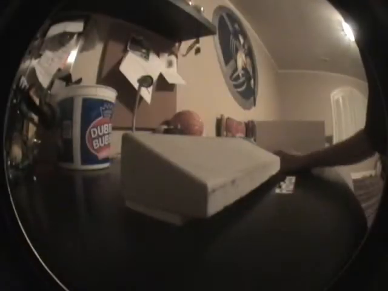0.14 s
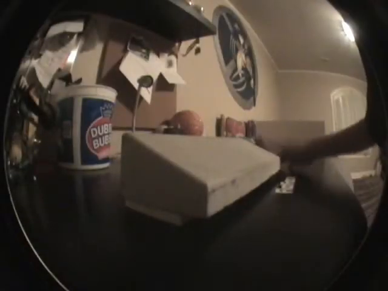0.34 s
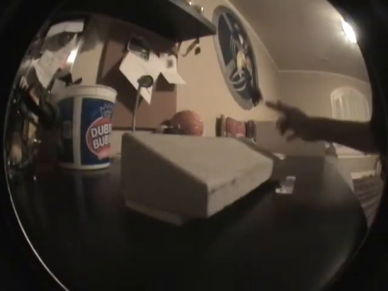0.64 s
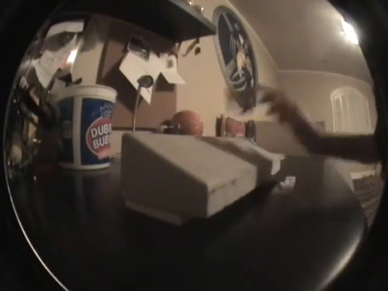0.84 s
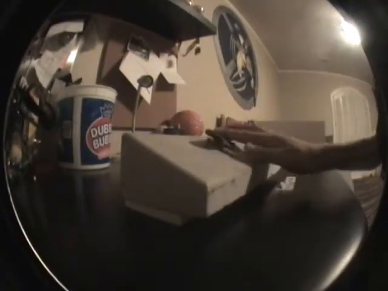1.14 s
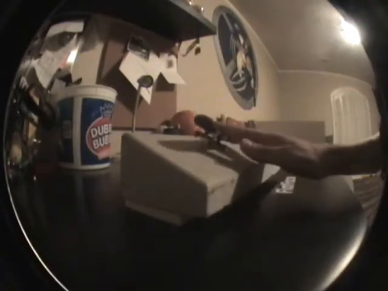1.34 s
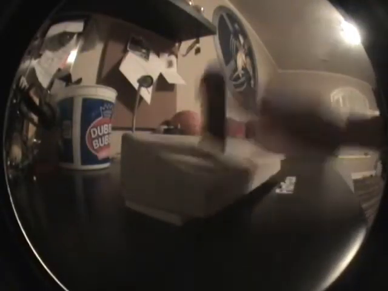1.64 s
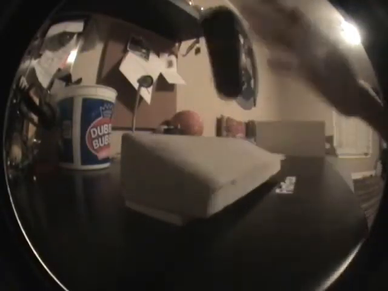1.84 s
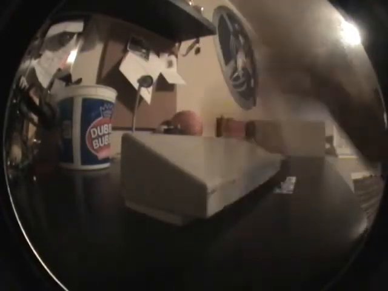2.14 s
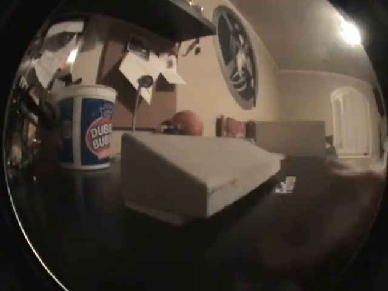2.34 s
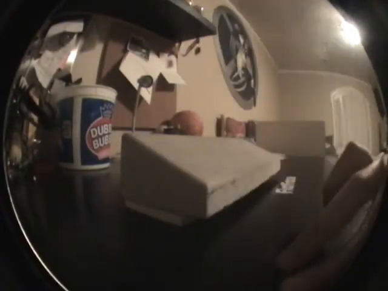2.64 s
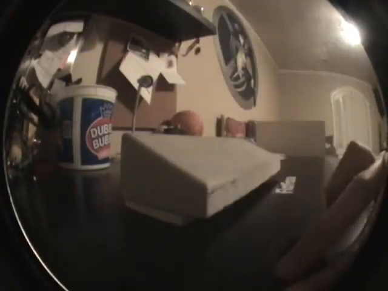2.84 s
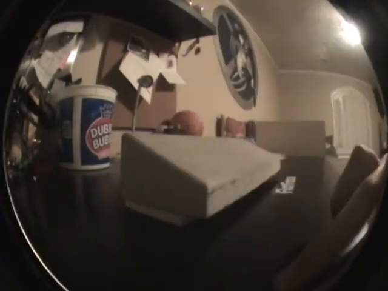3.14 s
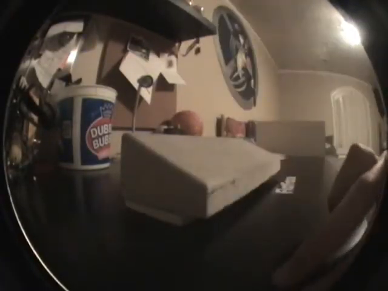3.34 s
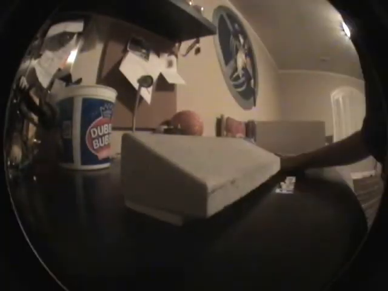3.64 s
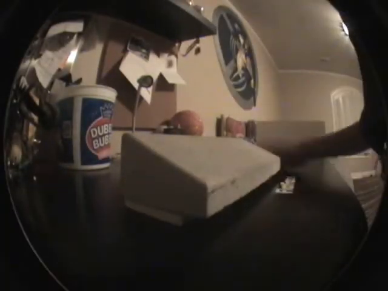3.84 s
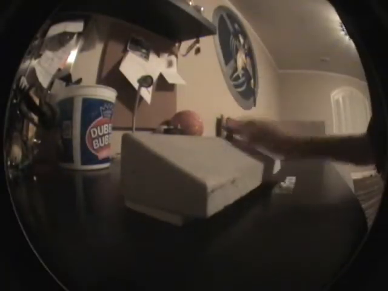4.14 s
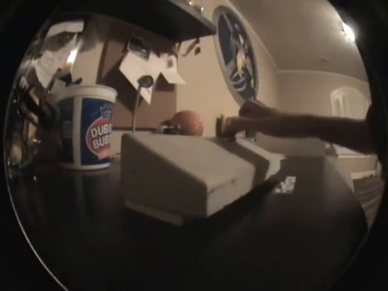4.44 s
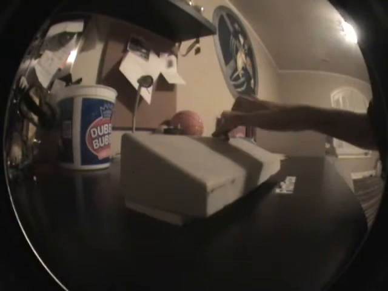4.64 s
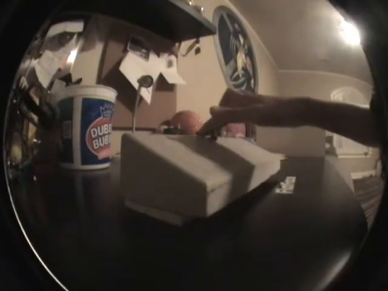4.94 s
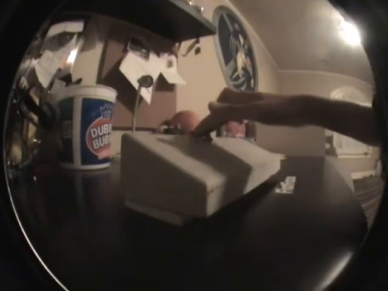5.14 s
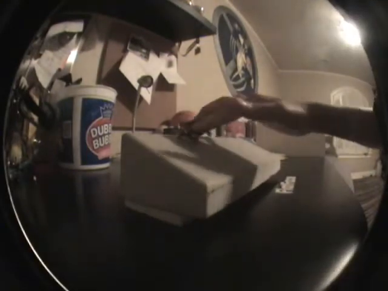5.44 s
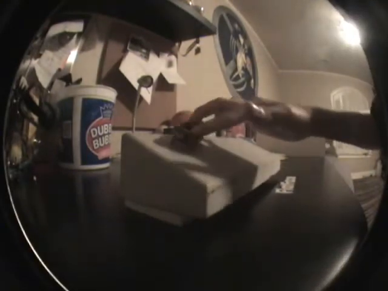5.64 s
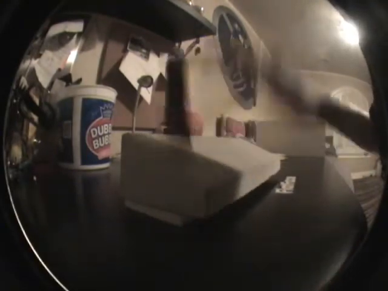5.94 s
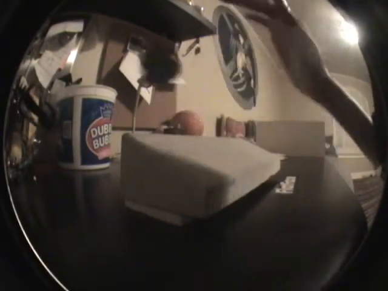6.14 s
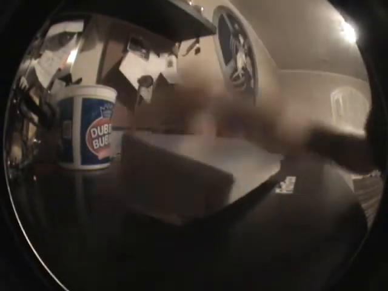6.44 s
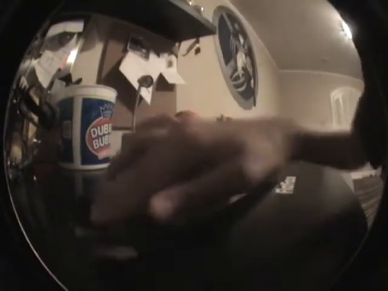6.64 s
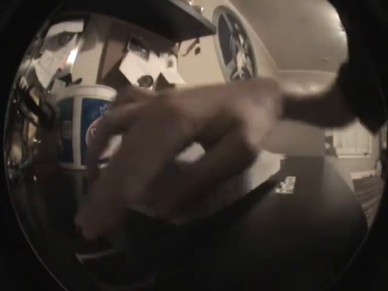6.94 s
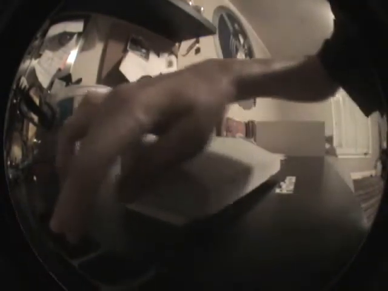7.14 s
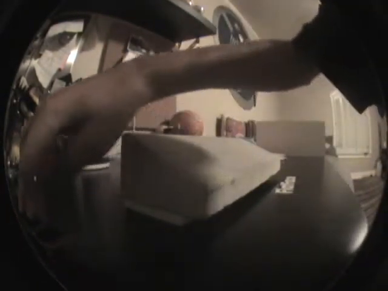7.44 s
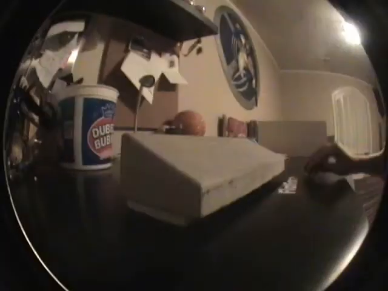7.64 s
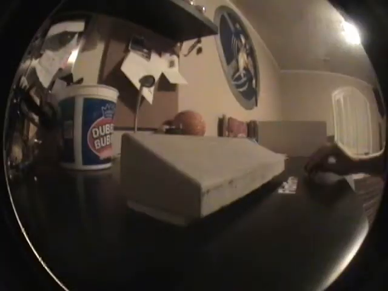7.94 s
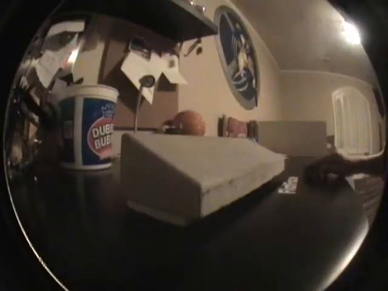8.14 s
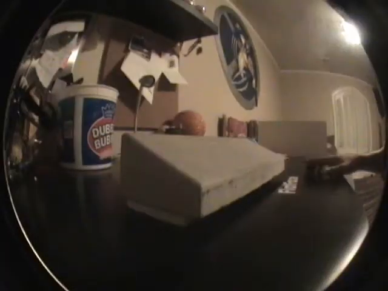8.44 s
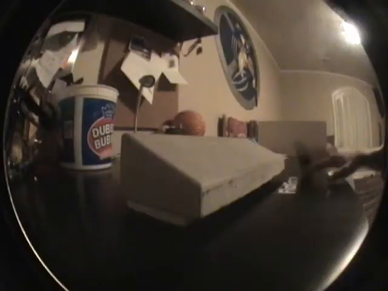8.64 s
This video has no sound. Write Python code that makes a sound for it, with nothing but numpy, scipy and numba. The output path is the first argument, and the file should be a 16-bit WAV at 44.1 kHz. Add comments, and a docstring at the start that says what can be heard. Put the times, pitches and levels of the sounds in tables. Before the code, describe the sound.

A toy finger skateboard is heard close up in a small room with faint hum and hiss, weighted to the left. It rolls on a wooden desk and snaps sharply at 0.2 seconds, then a slowed, deeper knock comes near 0.55. At about 1.1 it taps onto a concrete ramp and scrapes faintly. From 1.8 to 3.7 everything is half speed, dull and low: a clattering landing around 2.4, hollow desk rolling, a knock at 3.35. Total silence follows until nearly 4.0. A clack and a burst of knocks at 4.0 to 4.7 lead into light, thin scraping on concrete. A slowed pop at 6.05 gives way to a heavy clattering landing at 6.6, then loud gritty rolling until 7.6. Silence from 7.7 to 8.35, then a slow, muffled roll swelling into a coarse scrape and small knocks by 8.7.

```python
"""A toy finger skateboard rolls over a wooden desk, crosses a small concrete ramp, then rolls on the desk again.
After a silent gap near 3.7 s it returns to the desk and then the ramp; a last desk ride has a gap near 7.7 s.
Rolling is noise from grit ringing the deck; pops and landings are short pushes that ring deck, wheels and desk.
Four passages play at half speed, an octave lower and duller. A small room answers over soft hum and hiss."""
import sys
import numpy as np
from scipy import signal
from scipy.fft import rfft, irfft
from scipy.io import wavfile
from scipy.ndimage import uniform_filter1d
from numba import njit

SR = 44100
rng = np.random.default_rng(int(sys.argv[2]) if len(sys.argv) > 2 else 0)


def digitize_waveform(pressure):
    """Quantize a signal to 16-bit integers and store it at the path in sys.argv[1].

    Rows of a 2-D input are taken as channels; values are limited to [-1, 1].
    """
    field = np.atleast_2d(pressure).T
    bounded = np.clip(field, -1, 1)
    quanta = np.round(bounded * 32767).astype(np.int16)
    wavfile.write(sys.argv[1], SR, quanta)


N = 388080
T = np.arange(N) / SR  # time in seconds

# Passages played at half speed. Each row: start in seconds, end in seconds.
SLOW_SPANS = [(.445, .872), (1.806, 3.71), (5.97, 6.947), (8.345, 8.8)]
# Times when the board is on the concrete ramp. Each row: start in seconds, end in seconds.
RAMP_SPANS = [(1.06, 2.38), (4.24, 6.62)]
# Pops and landings. Each row: time in seconds, then the strength of the knock, crack and thump in dB.
BLOWS = [(0.049, -27.5, -62, -53), (0.156, -26.5, -52, -45), (0.188, 0.5, -8.5, -4), (0.221, -6, -26, -12),
         (0.563, 2, -5.5, -3.5), (0.614, -27, -26.5, -41), (1.066, -60, -14.5, -17),
         (1.081, -18.5, -22.5, -36), (1.101, -11, -13.5, -12.5), (1.141, -4, -33, -3),
         (1.345, -38, -42.5, -46), (1.539, -25, -56, -24), (1.625, -29.5, -69, -42),
         (1.728, -30, -29.5, -50), (1.8, -12.5, -12, -32), (1.808, -22.5, -11, -21.5),
         (1.863, -33.5, -32.5, -50), (2.351, -39, -42.5, -43.5), (2.386, -4.5, -7, -44),
         (2.397, -7, -14, -42), (2.408, -8, -7.5, -16), (2.419, -5, -18, -18), (2.43, -20, -11.5, -38),
         (2.432, -3, -8.5, -8), (2.439, -18, -11.5, -25), (2.441, -7.5, -30.5, -13.5),
         (3.349, -0.5, -24.5, -33), (3.354, -18, -45, -37), (4.002, -4, -9.5, -8), (4.248, -7, -8, -2),
         (4.279, -1.5, -9, -15), (4.318, 0, -33, -2.5), (4.327, -2, -41, -5.5), (4.36, -13, -39, -9.5),
         (4.394, -16.5, -40, -16), (4.459, -22.5, -27, -26), (4.482, -18.5, -26, -19),
         (4.608, -4.5, -37, -13.5), (4.656, -13, -44, -16), (4.708, -16.5, -56, -18),
         (5.432, -41, -42.5, -55), (6.046, -12.5, -7.5, -26), (6.625, 2, -4.5, -15.5),
         (6.652, -2.5, -6, -54), (6.655, -3, -42, -13), (6.682, -2, -10, -15.5), (6.692, 4, -12, -29),
         (7.01, -7.5, -15.5, -40), (7.324, -18, -19.5, -34), (7.433, -22, -28, -38),
         (7.675, -17.5, -37, -15.5), (8.348, -15.5, -31.5, -21), (8.684, -13.5, -40, -40),
         (8.714, -12, -27, -33), (8.745, -11, -20.5, -39)]
# What the desk wood radiates well. Each row: centre in Hz and width in Hz at full speed, level in dB.
DESK_WOOD = [(248, 600, 11.4)]


def undb(db):
    """Turn a level in dB into a gain."""
    return 10 ** (np.asarray(db) / 20)


def during(spans):
    """Give 1 inside the time spans and 0 outside."""
    return sum(((T >= start) & (T < end)) * 1. for start, end in spans)


def lowpass(x, hz):
    """Cut the treble above a frequency with a steep filter."""
    return signal.sosfilt(signal.ellip(8, .2, 80, hz, fs=SR, output="sos"), x)


def even(x):
    """Scale a sound to an rms level of 1."""
    return x / np.sqrt(np.mean(x ** 2))


@njit
def svf(x, hz, k):
    """State-variable band-pass with a moving centre and a gain of 1 there; k = width / centre."""
    y, band, low = np.empty(len(x)), 0., 0.
    for i in range(len(x)):
        g = np.tan(np.pi * hz[i] / SR)
        v = (band + g * (x[i] + 1e-18 - low)) / (1 + g * (g + k))
        band = 2 * v - band
        low = low + 2 * g * v
        y[i] = k * v
    return y


def ring(x, modes, speed):
    """A body's resonances, neighbours in opposite phase; half speed halves every pitch."""
    total = 0
    for k, (hz, width, db) in enumerate(modes):
        total = total + (-1) ** k * undb(db) * svf(x, hz * speed, width / hz)
    return total


def walk(rate):
    """Wandering level: random steps, this many a second, smoothed into straight slopes."""
    k = int(SR / rate)
    steps = np.repeat(rng.standard_normal(N // k + 1), k)
    return 1.7 * uniform_filter1d(steps, k)[:N]


def hush(speed):
    """Room hum and microphone hiss: shaped noise, alike left and right in the bass."""
    # Colour of the hush. Each row: frequency in Hz at speed 1, relative level in dB per Hz.
    hush_colour = np.array([(25, -7), (125, -8.5), (200, -18), (500, -9), (1000, -5.5), (2000, -14.5),
                            (4000, -24.5), (7000, -27), (7850, -26.5), (8700, -26), (14500, -39.5),
                            (16000, -63.5)])
    hush_db = -53.5  # average, before the wandering
    hz = np.arange(N // 2 + 1) * SR / N + 1
    gain = undb(np.interp(np.log(hz / speed), np.log(hush_colour[:, 0]), hush_colour[:, 1]))
    mid, side = rfft(rng.standard_normal((2, N))) * gain
    side = side * np.clip(hz / 6000, .2, .6)
    noise = irfft(np.array([1.3 * mid + side, .7 * mid - side]), N)
    return undb(hush_db + 1.5 * walk(6)) * even(noise)


def room(dry, speed):
    """Dense echoes that fade, treble first; lower speed draws them out; left and right tails differ widely."""
    echo_db = -13.5
    fade_s, treble_fade_s, damp_hz = 0.5, 0.5, 5140  # at speed 1; each fade is 60 dB, treble gets both
    t = np.arange(SR) / SR * speed
    mid, side = rng.standard_normal((2, SR))
    noise = mid + .8 * side * np.array([[1], [-1]])
    dull = signal.lfilter(*signal.butter(1, damp_hz * speed, fs=SR), noise)
    treble = (noise - dull) * undb(-60 * t / treble_fade_s)
    tail = (dull + treble) * undb(-60 * t / fade_s) * (t > .004)
    tail = tail / np.sqrt(np.sum(tail ** 2) / 2)
    return undb(echo_db) * signal.fftconvolve(dry, tail, axes=1)[:, :N]


def pan():
    """Follow where the board is: left minus right in dB."""
    # Each row: time in seconds, left minus right in dB.
    board_path = [(0.0, -7), (1.0, -6.5), (1.4, -7), (2.0, -7.5), (2.5, -8), (3.3, -11), (3.7, -11),
                  (4.0, -6.5), (5.9, -8), (6.6, -5), (7.2, -2.5), (7.55, -4), (7.65, -9), (8.4, -8.5),
                  (8.8, -12.5)]
    return np.interp(T, *np.transpose(board_path))


def place(x, pan_db, lag=0):
    """Split into left and right; the right port may hear it a few samples later."""
    return np.array([x * undb(pan_db / 2), np.roll(x, lag) * undb(-pan_db / 2)])


def grains(scatter_db, bumps_db):
    """Wheels meeting grit: dense ticks of uneven size, in bumpy runs."""
    size = undb(scatter_db * rng.exponential(size=N) + bumps_db * walk(45))
    return rng.standard_normal(N) * size


def swell(s, rise_s, hold_s, fall_s):
    """Pressure of one push in dB under its top: rise, full pressure from s on, fall."""
    drop_db = 21.5  # at the far end of a rise or fall
    curve = 1.065  # 1 is straight in dB, 2 has a rounded top
    away = np.maximum((s - T) / rise_s, (T - s - hold_s) / fall_s)
    return -drop_db * np.clip(away, 0, 4) ** curve


def leaning(speed):
    """The hand leans on the desk and it rumbles: low noise over a faint steady level."""
    # Each row: time of full pressure in seconds, hold in seconds, level in dB.
    hand_leans = [(0.0, 0.2, -44.5), (0.615, 0.031, -47.5), (1.176, 0.057, -48.5), (1.55, 0.3, -44.5),
                  (2.019, .3, -44.5), (3.496, 0.21, -49.5), (3.983, 0.036, -46.5), (4.627, 0.13, -44),
                  (5.916, .7, -40), (7.602, 0.083, -35), (8.365, 0.12, -50), (8.724, .08, -40.5)]
    # Low resonances. Each row: centre in Hz and width in Hz at full speed, relative level in dB.
    rumble_modes = [(53.7, 30, -3.5), (128, 85, 4)]
    rise_s, fall_s, idle_db = 0.03, 0.17, -53
    rumble = even(ring(ring(grains(1.5, 1.2), DESK_WOOD, speed), rumble_modes, speed))
    gain = undb(idle_db)
    for s, hold_s, db in hand_leans:
        gain = gain + undb(db + swell(s, rise_s, hold_s, fall_s))
    return rumble * gain


def pushes():
    """Gains of deck, grit and hiss and the deck's centre in Hz; pushes that overlap add up in power."""
    # Wheels in contact, one row a push. Each row: time of full pressure, rise, hold and fall in seconds,
    # deck ring in dB, its centre in Hz (as played), grit in dB, hiss in dB.
    finger_pushes = [ (0.205, 0.018, .05, 0.059, -24, 744, -36.5, -53.5),
                     (0.39, 0.06, 0.045, .03, -25.5, 690, -43.5, -47),
                     (0.45, 0.022, 0.021, .08, -24, 300.4, -50, -71.5),
                     (0.55, 0.03, 0.0064, 0.017, -23.5, 536, -36.5, -44.5),
                     (0.6, 0.024, 0.12, 0.24, -32.5, 285, -56, -46),
                     (1.071, .01, .06, 0.15, -39, 891, -39.5, -43),
                     (1.38, .06, 0.032, .04, -47, 1060, -50, -57),
                     (1.55, .02, 0.077, 0.11, -44.5, 240, -64, -67),
                     (1.714, 0.069, 0.015, .08, -43.5, 500, -50, -51.5),
                     (2.46, .02, 0.043, .3, -28, 450, -49.5, -66),
                     (2.72, .1, 0.11, 0.073, -26.5, 560, -38.5, -48),
                     (3.28, 0.083, 0.087, 0.026, -32.5, 460, -46, -56),
                     (3.48, 0.018, 0.034, 0.078, -31, 450, -43, -69),
                     (3.642, 0.12, 0.068, 0.095, -24, 520, -40.5, -43.5),
                     (3.99, 0.027, 0.0091, 0.045, -21.5, 440, -36, -39),
                     (4.02, 0.022, .03, 0.18, -29.5, 460, -42.5, -41.5),
                     (4.249, .01, .06, 0.13, -36.5, 598, -36, -37.5),
                     (4.4, .1, 1.55, 0.043, -49.5, 508, -61.5, -59.5),
                     (4.52, 0.054, .05, 0.018, -47, 500, -44, -63.5),
                     (4.63, 0.033, .08, .05, -42.5, 700, -40.5, -51.5),
                     (4.86, 0.14, 0.13, 0.067, -38, 894, -43, -47),
                     (5.15, 0.086, 0.075, 0.037, -42.5, 990, -39.5, -49.5),
                     (5.38, 0.053, .05, .04, -43.5, 1060, -58.5, -54),
                     (5.54, .04, 0.071, 0.073, -36.5, 1040, -64, -58),
                     (5.93, .1, 0.071, 0.067, -42, 440, -51, -55),
                     (6.056, 0.011, 0.025, 0.34, -47, 499, -46, -53),
                     (6.72, 0.015, .05, 0.2, -23, 400, -46, -66.5),
                     (6.85, .1, 0.046, 0.13, -18.5, 390, -31.5, -40.5),
                     (7.015, 0.012, 0.037, 0.022, -21.5, 720, -37, -47.5),
                     (7.13, 0.017, 0.0312, 0.056, -23, 955, -25.5, -42),
                     (7.19, 0.034, 0.022, 0.17, -21.5, 950, -32.5, -42),
                     (7.31, 0.034, 0.047, 0.071, -17.5, 960, -31.5, -43),
                     (7.39, 0.079, 0.096, 0.083, -20, 750, -33.5, -43),
                     (7.6, 0.023, .07, 0.037, -29, 500, -46.5, -38),
                     (8.36, .02, 0.04, 0.11, -24.5, 300, -42.5, -44.5),
                     (8.48, 0.11, .1, 0.076, -19.5, 410, -40, -48.5),
                     (8.695, 0.036, 0.079, 0.037, -15, 540, -21, -41.5), ]
    steeper = 1.014  # grit and hiss follow finger pressure more steeply than the deck
    deck = pitch = grit = hiss = 0
    for s, rise_s, hold_s, fall_s, deck_db, hz, grit_db, hiss_db in finger_pushes:
        press_db = swell(s, rise_s, hold_s, fall_s)
        power = undb(deck_db + press_db) ** 2
        deck = deck + power
        pitch = pitch + power * hz
        grit = grit + undb(grit_db + steeper * press_db) ** 2
        hiss = hiss + undb(hiss_db + steeper * press_db) ** 2
    return np.sqrt(deck), pitch / deck, np.sqrt(grit), np.sqrt(hiss)


def rolling(speed):
    """Grit shakes the deck, scrapes and hisses; deck and grit ring differently on wood and concrete."""
    # What rings while rolling. Each row: centre in Hz and width in Hz at full speed, relative level in dB.
    deck_desk_modes, deck_ramp_modes = [(389, 281, 2.5), (550, 950, 1), (839.6, 160, 1.5), (975.7, 32, -1),
                                        (1357, 390, -2.5)], [(437, 200, 7), (690, 100, 3.5),
                                                              (1020, 810, 17), (1065, 470, 20.5)]
    grit_desk_modes, grit_ramp_modes = [(2380, 350, 0), (3050, 450, -1), (4200, 1200, -12)], [(1940, 110, 4), (2750, 500, -6),
                                                              (3750, 700, -1), (4800, 600, -8),
                                                              (7850, 500, -14)]
    hiss_modes = [(2880, 4200, 4), (7400, 9800, -11.5)]
    ramp = during(RAMP_SPANS)
    deck_gain, centre, grit_gain, hiss_gain = pushes()
    # finger pressure picks which deck modes speak
    centre = np.clip(centre, 100, 3000)
    push = svf(svf(grains(1.0, 1.9), centre, 1.6), centre, 1.6)
    deck_on_ramp = even(ring(push, deck_ramp_modes, speed))
    deck_on_desk = even(ring(push, deck_desk_modes, speed))
    deck = ramp * deck_on_ramp + (1 - ramp) * deck_on_desk
    scratch = ring(grains(2.5, 2.0), [(3200, 4500, 0)], speed)
    grit_on_ramp = even(ring(scratch, grit_ramp_modes, speed))
    grit_on_desk = even(ring(scratch, grit_desk_modes, speed))
    grit = ramp * grit_on_ramp + (1 - ramp) * grit_on_desk
    hiss = even(ring(grains(2.0, 2.0), hiss_modes, speed))
    return deck * deck_gain, grit * grit_gain + hiss * hiss_gain


def blows(db, push_s, rattle, rattle_s, speed):
    """Each blow is a short push with a fading, uneven rattle of loose trucks (the wheel axles)."""
    length = 2048  # samples kept of each blow
    out = np.zeros(N + length)
    chance = rng.standard_normal((len(BLOWS), length))
    for s, level, noise in zip(np.transpose(BLOWS)[0], db, chance):
        i = int(s * SR)
        t = np.arange(length) / SR * speed[i]  # half speed stretches the blow
        uneven = np.abs(np.repeat(noise[::64], 64))
        fade = np.exp(-t / rattle_s) + .2 * np.exp(-t / .008) * uneven
        out[i:i + length] += undb(level) * (np.exp(-t / push_s) + rattle * noise * fade)
    return out[:N]


def clacks(speed):
    """Pops and landings: the deck knocks, wheels crack, the ramp block or the desk thumps."""
    # What rings after a blow: deck wood, deck, wheels, ramp block, desk.
    # Each row: centre in Hz and width in Hz at full speed, relative level in dB.
    deck_wood, knock_modes, crack_modes = [(815, 645, 13.44)], [(410, 290, -0.5), (905, 900, 0),
                                                              (1016, 160, -0.5), (1490, 380, -5.5)], [(1660, 460, 6),
                                                                             (2840, 1100, 12),
                                                                             (3580, 1300, 13),
                                                                             (6500, 3700, 6.5),
                                                                             (10670, 5400, -2)]
    block_modes, desk_modes = [(125, 11, 4.5), (185, 13, -1), (312, 82, -4)], [(130, 710, -8.5), (262, 69, -3), (400, 87, 5),
                                              (630, 320, 3.5)]
    _, knock_db, crack_db, thump_db = np.transpose(BLOWS)
    ramp = during(RAMP_SPANS)
    knock = ring(blows(knock_db, 0.000086, 0.77, .0015, speed), deck_wood, speed)
    knock = ring(knock, knock_modes, speed)
    crack = ring(blows(crack_db, .00004, 0.89, 0.0019, speed), crack_modes, speed)
    weight = ring(blows(thump_db, 0.00034, .2, 0.0023, speed), DESK_WOOD, speed)
    thump = ring(weight * ramp, block_modes, speed) + ring(weight * (1 - ramp), desk_modes, speed)
    return knock, crack, thump


def scene():
    """Put all sources in the room, passage by passage."""
    slow = during(SLOW_SPANS)
    speed = 1 - slow / 2
    rumble = leaning(speed)
    deck, grit = rolling(speed)
    knock, crack, thump = clacks(speed)
    wood = place(deck + knock, pan(), lag=6) + place(rumble + thump, pan())
    wheels = grit + crack
    # an echo off the desk arrives from the side
    glance = .33 * np.roll(wheels, 19) * np.array([[1], [-1]])
    # the two ports differ less in the treble
    wheels = place(wheels, .45 * pan()) + glance
    # the low wood sounds get a little less room echo
    walls = wheels + undb(-2.5) * wood
    echo = room(walls * slow, 0.39) + room(walls * (1 - slow), 0.75)
    background = slow * hush(0.47) + (1 - slow) * hush(1.0)
    return wood + wheels + echo + background


def record(dry):
    """Peaks are squashed; slow passages turn dull with a faint mirror of the treble; gaps are mute."""
    # Silent gaps. Each row: start in seconds, end in seconds.
    silent_gaps = [(3.708, 3.975), (7.684, 8.347)]
    slow_top_hz, mirror_top_hz, top_hz, mirror_db = 7350, 15900, 16800, -8
    soft = signal.lfilter(*signal.butter(2, 12500, fs=SR), dry)  # the microphone rolls off its top
    loud = np.tanh(0.92 * soft) * 1.215
    dull = lowpass(loud, slow_top_hz)
    # stretching samples to twice their length mirrors the spectrum about a quarter of the sample rate
    mirror = lowpass(dull * (-1.) ** np.arange(N), mirror_top_hz)
    slow = during(SLOW_SPANS)
    edit = slow * (dull + undb(mirror_db) * mirror) + (1 - slow) * loud
    edit = edit * (1 - during(silent_gaps))
    return lowpass(np.clip(edit, -1, 1), top_hz)


dry = scene()
out = record(dry)
digitize_waveform(out)
```